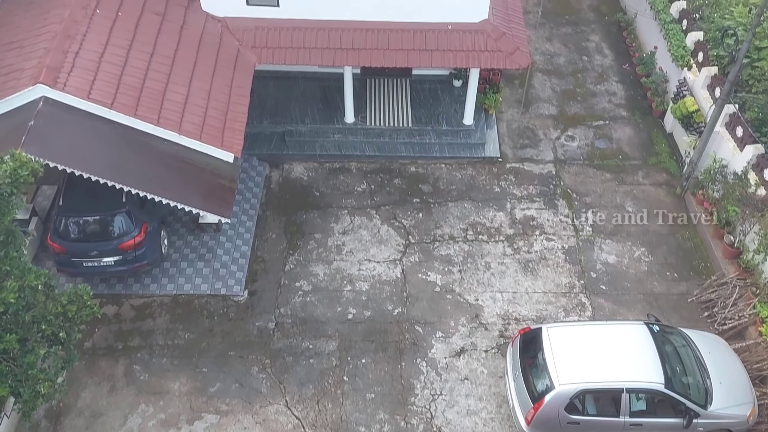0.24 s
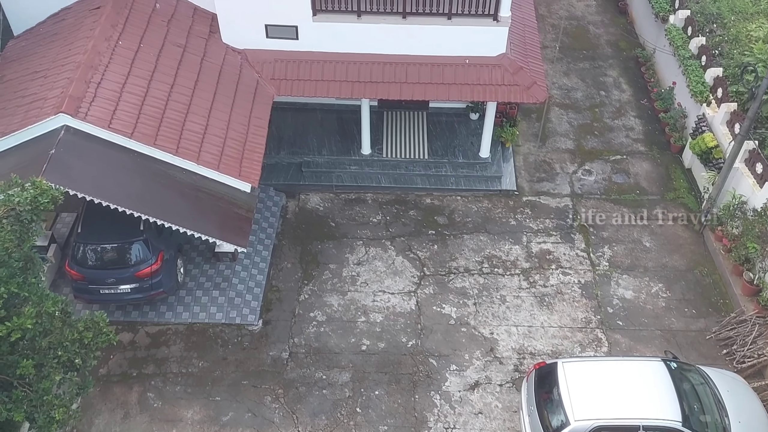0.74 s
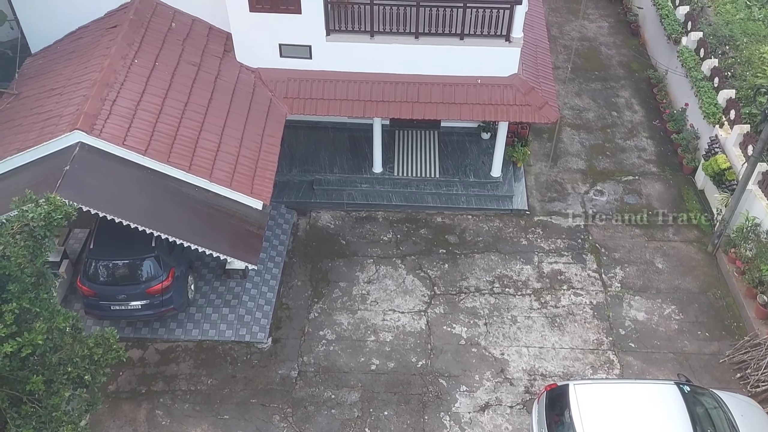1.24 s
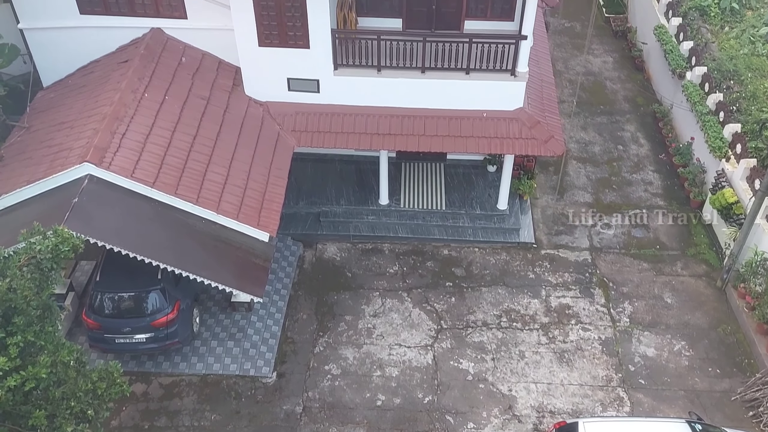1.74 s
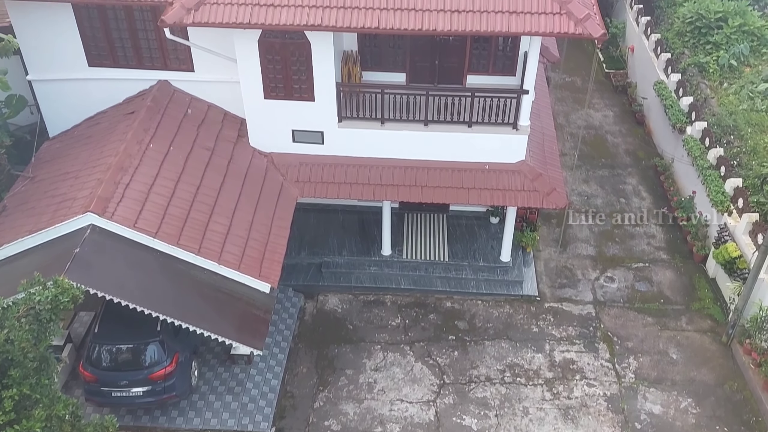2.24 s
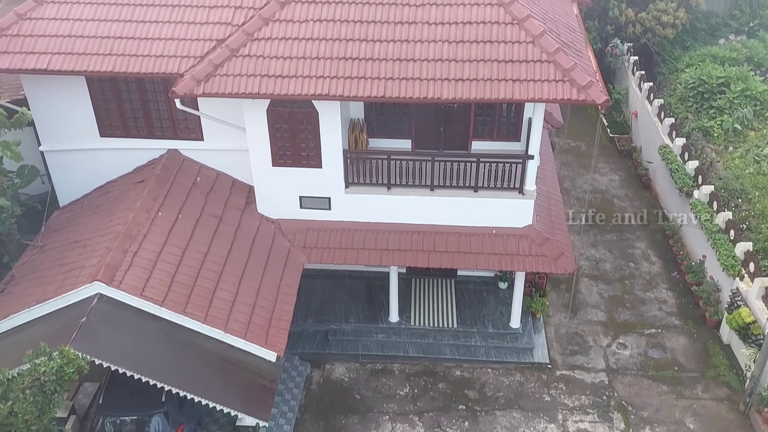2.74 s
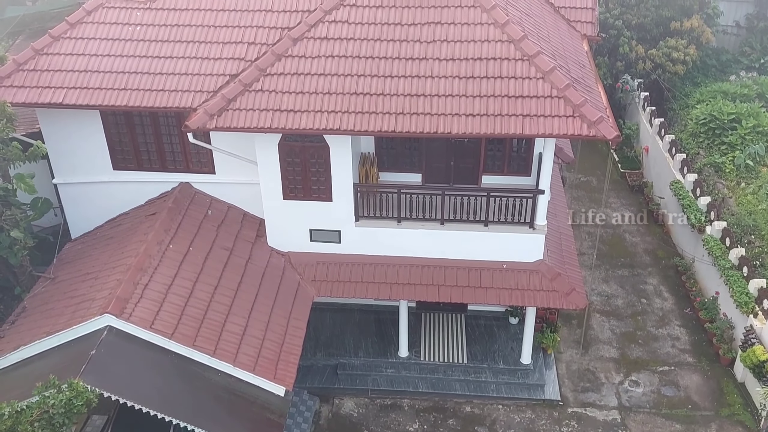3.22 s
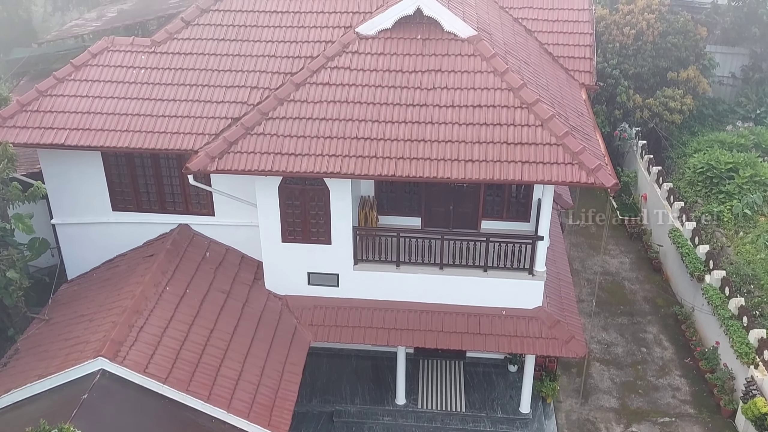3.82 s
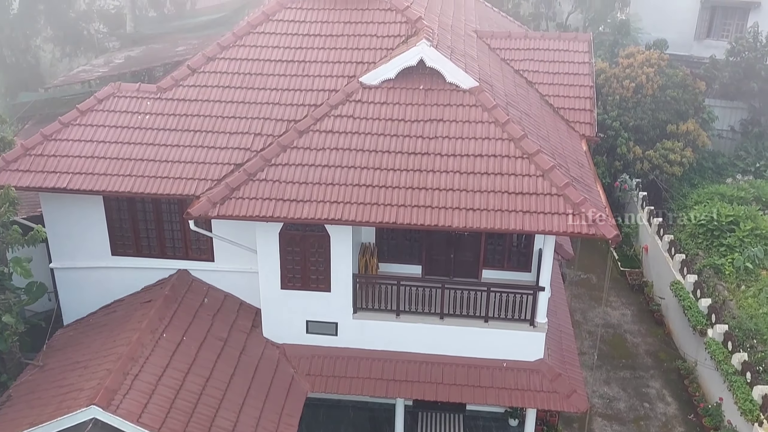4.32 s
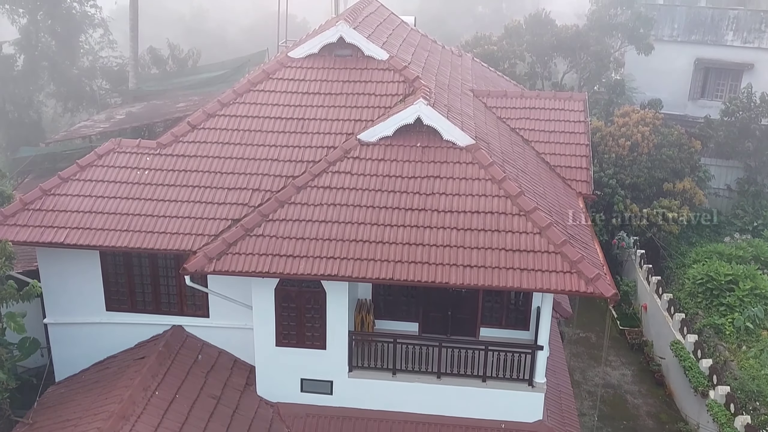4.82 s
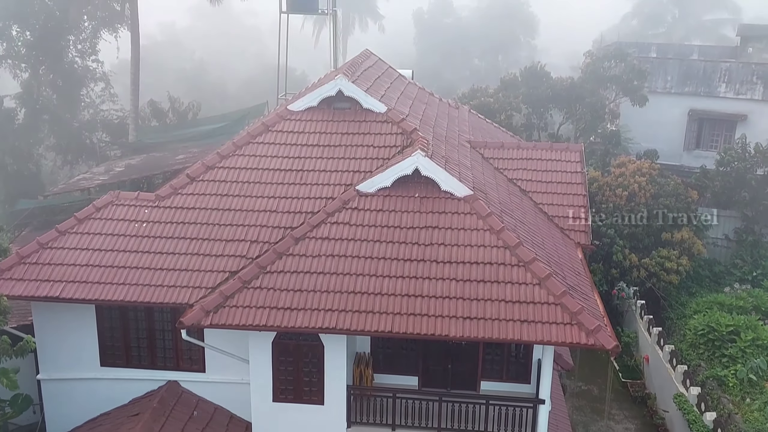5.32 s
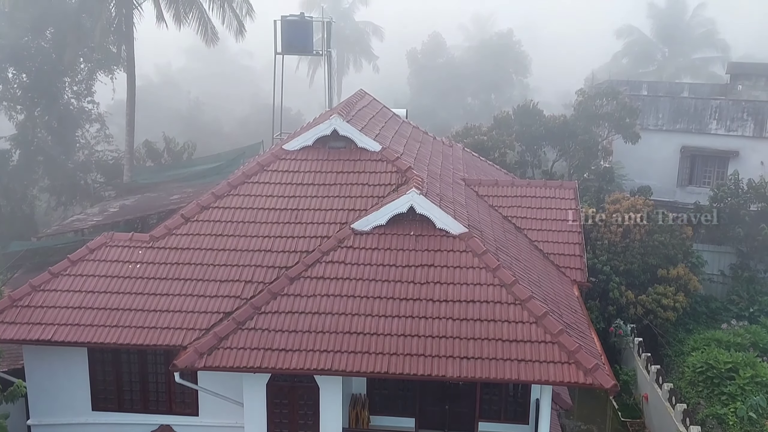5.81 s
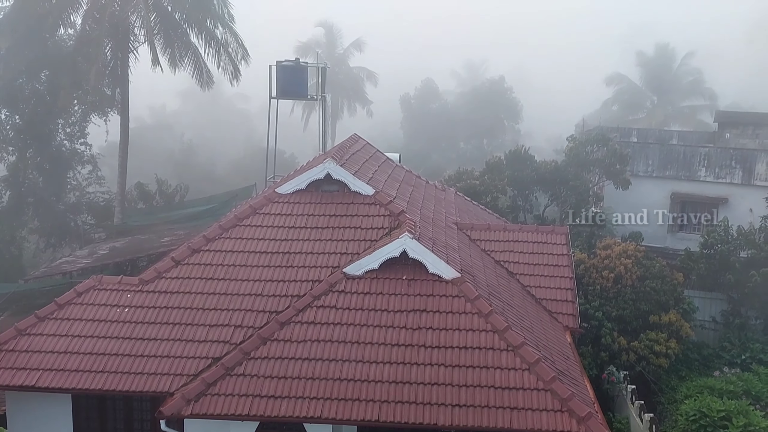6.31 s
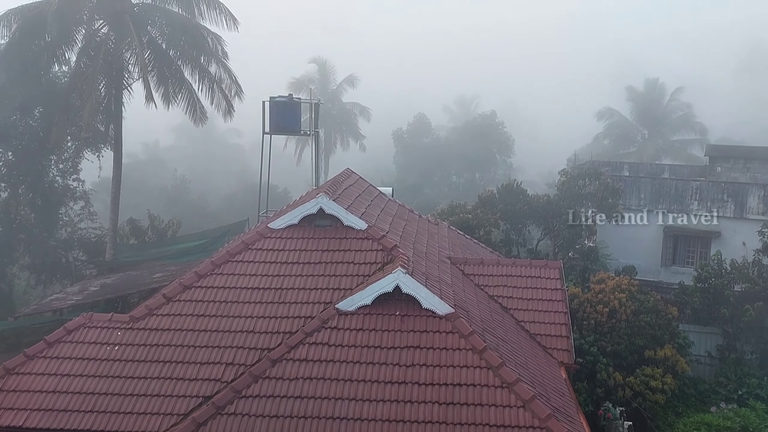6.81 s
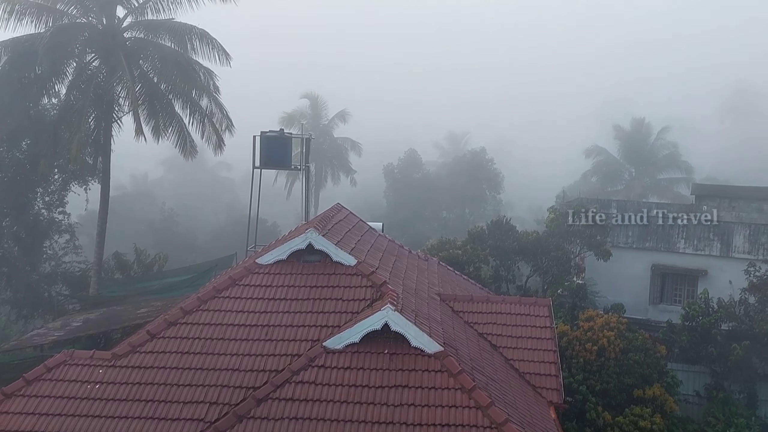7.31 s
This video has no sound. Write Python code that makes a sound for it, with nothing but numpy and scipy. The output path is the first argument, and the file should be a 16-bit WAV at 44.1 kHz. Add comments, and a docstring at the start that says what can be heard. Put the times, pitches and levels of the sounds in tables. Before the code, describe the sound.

Many small birds chirp from the first moment, thin whistles and quick twitters leaning right, with fainter birds deep in the trees. Beneath them lie low road rumble, faint hum and flickering hiss. Grit crunches and stones snap near the stereo microphone. Halfway, three falling hoarse calls sound beside a lower husky bird; two dull knocks and a tiny cluster of wet drips come next, and birdsong continues to the end.

```python
"""Early morning in a garden: traffic rumble, engine drone and hiss run throughout, as filtered noise and sines.
Gritty scuffs (noise grains under a push) and dry rustling start at once, then small birds, gliding sines
mostly to the right, whistle, slur and twitter to the end. Insects rasp most from 1.2 to 3.8 s. A larger bird
calls three times from 3.1 to 4.3 s, a lower, huskier one beside it; two thuds (damped modes) land near 5.05 s.
Wet plips, sines that ring for a few cycles, come at 2.96 s and in a cluster near 5.39 s."""
import sys
import numpy as np
from scipy import signal
from scipy.fft import rfft, irfft
from scipy.io import wavfile

SR = 44100
rng = np.random.default_rng(int(sys.argv[2]) if len(sys.argv) > 2 else 0)


def generate_wav(sig):
    """Save sig (samples, or channels by samples) to the path in sys.argv[1] as 16-bit PCM at SR."""
    pcm = np.round(np.clip(np.atleast_2d(sig).T, -1, 1) * 32767).astype(np.int16)
    wavfile.write(sys.argv[1], SR, pcm)


N = 333175
T = np.arange(N) / SR
PORT_LAG_S = .00047  # travel time between the two microphone ports
SWELL_POWER, HELD_POWER = .4, .18  # note envelope exponents: swelling, firmly held


def undb(db):
    """Decibels to gain."""
    return 10 ** (np.asarray(db) / 20)


def unit(x):
    """Scale to rms 1."""
    return x / np.sqrt(np.mean(x ** 2))


def curves(table):
    """Columns of a table against its first (s), joined by straight lines."""
    s, *columns = np.transpose(table)
    return [np.interp(T, s, c) for c in columns]


def walk(rate_hz, size=N):
    """Random curve with rate_hz knots per second and a spread near 1."""
    at = np.arange(size) * rate_hz / SR
    return 1.275 * np.interp(at, np.arange(8192), rng.standard_normal(8192))


def surges(table):
    """Gain of sounds that swell and fade in a bell shape, summed in power."""
    power = 0
    for s, width_s, db in table:
        power = power + undb(2 * db) * np.exp(-np.minimum(((T - s) / width_s) ** 2, 60))
    return np.sqrt(power)


def colour(x, points):
    """Filter by a (Hz, dB) outline that falls 24 dB per octave more beyond its ends; rms 1."""
    size = 2 ** 19
    hz, db = np.transpose(points)
    octave, knots = np.log2(np.fft.rfftfreq(size, 1 / SR) + 1), np.log2(hz)
    outside = np.abs(octave - np.clip(octave, knots[0], knots[-1]))
    gain = undb(np.interp(octave, knots, db) - 24 * outside)
    return unit(irfft(rfft(x, size) * gain)[..., :N])


def stereo_noise(likeness):
    """Two white noises with a given correlation."""
    mid, side = rng.standard_normal((2, N))
    c = np.clip(likeness, -1, 1)
    return np.sqrt(1 + c) * mid + np.sqrt(1 - c) * side * np.array([[1], [-1]])


def grains(spread_db):
    """Noise broken into millisecond grains of unequal size."""
    return rng.standard_normal(N) * undb(spread_db * walk(900))


def pan(right_db):
    """Left and right gains, right_db apart, whose mean is 1."""
    gains = undb(np.array([[-right_db], [right_db]]) / 2)
    return gains / gains.mean()


def from_the_side(pair):
    """The right channel arrives one port spacing late."""
    return np.array([pair[0], np.interp(T - PORT_LAG_S, T, pair[1])])


def add(track, s, sound):
    """Mix a sound in at a time."""
    i = int(np.clip(s * SR, 0, N - 1))
    track[i:i + len(sound)] += sound[:N - i]


def garden(x, right_db, lag_s, wet_db, t60_s):
    """Direct sound reaches the right port lag_s late; walls and foliage scatter a short noise tail."""
    t = T[:SR // 2]
    tail = rng.standard_normal((2, len(t))) * undb(-60 * t / t60_s) * (1 - np.exp(-t / 0.0013))
    tail /= np.sqrt(np.sum(tail ** 2, axis=1, keepdims=True))
    direct = np.array([x, np.interp(T - lag_s, T, x)])
    scattered = signal.fftconvolve(x[None], tail, axes=1)[:, :N]
    return pan(right_db) * (direct + undb(wet_db) * scattered)


def traffic():
    """Far traffic: rumble nearly common to both sides and a wider road noise."""
    # Each row: time in s, rumble in dB, road noise in dB.
    level_rows = [(0, -41, -39.5), (.3, -39, -44), (.7, -44.5, -44.5), (1.4, -39, -43), (3.3, -40.5, -42),
                  (5.6, -39.5, -43.5), (6.15, -44, -48), (6.6, -40, -46.5), (7.55, -44, -47.5)]
    # Spectra. Each row: frequency in Hz, relative level in dB.
    rumble_outline = [(20, -36), (35, -13), (50, -15.5), (75, 1), (125, -1.5), (160, -10.5), (230, -27.5)]
    road_outline = [(100, -8), (180, -0.5), (280, -0.5), (350, -7), (410, -7.5), (550, -15.5), (850, -21.5),
                    (1400, -32), (2500, -55)]
    rumble_db, road_db = curves(level_rows)
    rumble = pan(3.1) * undb(rumble_db) * colour(stereo_noise(0.99), rumble_outline)
    road = pan(0.23) * undb(road_db) * colour(stereo_noise(0.83), road_outline)
    return rumble + road


def traffic_swells():
    """Hollow swells of traffic near 200 Hz: band noise under bell curves."""
    # Each row: peak in s, half width in s, level in dB.
    swell_rows = [(.02, 0.2, -40), (2.12, 0.14, -41), (3.4, 0.81, -52)]
    # Spectrum. Each row: frequency in Hz, relative level in dB.
    outline = [(140, 8), (170, 7), (230, 3.5), (280, -21)]
    return pan(0.92) * surges(swell_rows) * colour(stereo_noise(0.93), outline)


def engine(table, orders, waver):
    """Only some orders of a far engine's cycle rate carry; the air makes each one waver."""
    hz, db = curves(table)
    phase = 2 * np.pi * np.cumsum(hz) / SR
    drone = np.zeros(N)
    for multiple, order_db in orders:
        strength = undb(order_db) * (1 + waver * walk(4.3))
        shift = 2 * np.pi * rng.random() + waver * walk(6.5)
        drone += strength * np.sin(round(multiple) * phase + shift)
    return pan(0.31) * undb(db) * unit(drone)


def engines():
    """Two far engines drone, each with its own rate and orders."""
    # Each row: time in s, cycle rate in Hz, level in dB.
    course_a = [(0, 18.4, -62), (1.3, 21, -44), (2.2, 19.5, -42), (2.6, 18.6, -35), (3.6, 21, -36.5),
                (4.3, 18, -42.5), (5.2, 17, -41.5), (6.1, 14.7, -53.5), (6.5, 19.9, -46),
                (7.55, 16.2, -53.5)]
    course_b = [(0, 16.8, -50.5), (2.3, 26.2, -46.5), (3.6, 21.2, -40.5), (4.3, 22, -39.5), (4.7, 23, -37),
                (5.1, 21.5, -41), (6, 17.7, -57), (7.55, 11.4, -83)]
    # Each row: multiple of the cycle rate, relative level in dB.
    orders_a = [(3, -2.5), (5, -12), (6, 4), (7, 3.5), (13, -10.5), (14, -17)]
    orders_b = [(2, -7.5), (3, -2.5), (8, -14.5)]
    return engine(course_a, orders_a, waver=0.1) + engine(course_b, orders_b, waver=0.04)


def hum():
    """A faint sine near 398 Hz wavers in pitch and level."""
    hz = 398 + 4 * walk(9)
    level_db = -56.0 + 2.5 * walk(5.5)
    return pan(1.6) * undb(level_db) * np.sin(2 * np.pi * np.cumsum(hz) / SR)


def hisses():
    """Flickering mid and high hisses lean right over a steady one: coloured noises."""
    # Each row: time in s, level in dB before the gain below.
    mid_rows = [(0.0, -55), (0.53, -55), (0.9, -54.5), (1.24, -51.5), (1.64, -53.5), (1.87, -52),
                (3.22, -50), (4.81, -52), (5.0, -52), (5.55, -53.5), (6.64, -55), (7.55, -55)]
    high_rows = [(0.0, -58), (0.38, -56.5), (0.73, -56), (2.19, -59.5), (2.94, -56), (5.61, -59),
                 (5.72, -54), (5.9, -58), (6.27, -63.5), (6.6, -54), (7.55, -61)]
    # Spectra. Each row: frequency in Hz, relative level in dB.
    mid_outline = [(400, 10), (800, -10.5), (1300, 3.5), (1550, -0.5), (1800, 1), (2200, 2.5), (2700, 0.5),
                   (2950, 1), (3400, -6), (5000, -59), (7000, -52)]
    steady_outline = [(500, -11), (680, 2), (900, -3), (1350, 0), (1800, -8), (2600, -27)]
    high_outline = [(1000, 4.5), (2800, 3), (4000, 5.5), (5000, 4.5), (5500, -4.5), (6600, -5.5),
                    (7600, -8), (8300, -31.5), (11000, -19.5), (15000, -20.5)]
    mid_gain_db, high_gain_db = 3, 4
    mid_db = curves(mid_rows)[0] + mid_gain_db + 0.87 * walk(15)
    high_db = curves(high_rows)[0] + high_gain_db + 1.3 * walk(12)
    mid = pan(11.6) * undb(mid_db) * colour(stereo_noise(0.38), mid_outline)
    steady = pan(1.4) * undb(-53.5) * colour(stereo_noise(0.81), steady_outline)
    high = pan(5.0) * undb(high_db) * colour(stereo_noise(0.23), high_outline)
    return from_the_side(mid + steady + high)


def insects():
    """Far insects rasp near one pitch: a narrow noise band in short random bursts."""
    # Each row: time in s, level in dB.
    level_rows = [(0, -62), (.85, -67), (1.2, -52.5), (1.7, -48.5), (2, -52.5), (2.45, -51), (3.1, -51),
                  (3.8, -55.5), (4.8, -63), (5.6, -68), (7.55, -59.5)]
    # Spectrum. Each row: frequency in Hz, relative level in dB.
    outline = [(1700, -12.5), (2000, -3), (2170, -1), (2300, -3.5), (2480, -2), (2650, -8.5)]
    level_db = curves(level_rows)[0]
    bursts = undb(2.2 * walk(60))
    band = colour(stereo_noise(0.59) * bursts, outline)
    return pan(8.4) * undb(level_db) * from_the_side(band)


def rustling():
    """Spells of dry rustling on the right: bright noise grains over a faint constant bed."""
    # Each row: peak in s, half width in s, level in dB.
    spells = [(1.98, 0.12, -63), (3.2, 0.15, -67), (4.26, 0.078, -58), (5.15, 0.22, -65), (5.72, 0.22, -70),
              (6.7, 0.05, -58), (7, 0.4, -57.5)]
    # Spectrum. Each row: frequency in Hz, relative level in dB.
    outline = [(5000, 10), (8200, -9), (9500, -1), (12500, -4.5), (15500, -7.5)]
    rest_db = -71
    strength = np.hypot(surges(spells), undb(rest_db))
    return pan(14.4) * strength * colour(np.array([grains(3.6), grains(1.1)]), outline)


def thuds():
    """Dull knocks as the weight lands: a soft blow rings a few low, heavily damped modes."""
    # Each row: time in s, level in dB before the scatter.
    blows = [(5.026, -31.5), (5.079, -28)]
    # Each row: mode frequency in Hz, relative level in dB.
    modes = [(310, -0.5), (395, 0), (520, -5.5), (690, -22)]
    rise_s, decay_s = .001, 0.006
    t, track = T[:SR // 10], np.zeros(N)
    envelope = (1 - np.exp(-t / rise_s)) * np.exp(-t / decay_s)
    for s, db in blows:
        ring = sum(undb(mode_db) * np.sin(2 * np.pi * (hz * t + rng.random())) for hz, mode_db in modes)
        add(track, s, undb(db) * envelope * ring)
    return garden(track, right_db=-2, lag_s=0, wet_db=-9, t60_s=0.31)


def scuffs():
    """Grit grinds under a push: a dull crunch, a bright spray and stones snapping, with a glassy edge."""
    # Each row: peak in s, rise in s, body and grit in relative dB.
    pushes = [(.03, 0.042, -52.5, -63.5), (.345, 0.039, -49, -66), (1.03, 0.057, -50.5, -61),
              (1.723, 0.041, -48, -65.5), (1.857, 0.024, -54, -64), (2.48, 0.076, -53, -62.5),
              (3.772, 0.037, -42.5, -53.5), (4.46, 0.056, -51, -62.5), (5.034, 0.0059, -37.5, -58),
              (5.059, 0.0068, -35, -54), (5.074, 0.0089, -37.5, -52), (5.095, 0.01, -52, -59),
              (5.16, 0.039, -53, -63), (5.735, 0.058, -68, -61.5), (6.357, 0.009, -41, -62),
              (6.412, 0.025, -40, -50.5), (7.034, 0.038, -45, -51.5)]
    # Each row: time in s, snap level in dB, glassy edge level in dB.
    tick_rows = [(1.029, -40, -56), (1.041, -40, -54), (1.855, -40, -56), (2.432, -45, -56),
                 (2.452, -39, -50), (2.492, -41, -55), (2.521, -42.5, -55), (2.561, -46, -56),
                 (3.764, -34, -42), (3.798, -38, -49), (5.037, -41, -54), (5.063, -39, -44),
                 (5.073, -38, -41), (5.736, -35, -53), (5.778, -46, -48), (6.351, -41, -56),
                 (6.389, -34, -53), (6.395, -38, -56), (6.407, -39, -37), (6.414, -40, -40),
                 (6.442, -38, -54), (7.04, -33, -37)]
    # Spectra. Each row: frequency in Hz, relative level in dB.
    body_outline = [(100, 9.5), (350, 2), (700, -1), (1600, -7), (2300, 1.5), (4200, -4.5), (5500, -7.5),
                    (7500, -43), (9000, -46)]
    grit_outline = [(2000, -20), (4500, -6), (7000, 12), (8500, -2), (11000, 4.5), (13500, 2), (15500, -12)]
    snap_outline = [(500, 9), (2500, 5.5), (6000, 9), (7400, -5), (8500, -14), (11000, -11), (14000, -16)]
    edge_outline = [(7000, -5), (9000, -4), (11000, -1), (13500, -1), (15500, -5)]
    fall_ratio = 0.82  # fall time over rise time
    snap_decay_s, edge_decay_s = 0.0023, .0011
    body, grit, snap, edge = np.zeros((4, N))
    for s, rise_s, body_db, grit_db in pushes:
        distance = np.maximum((s - T) / rise_s, (T - s) / (fall_ratio * rise_s))
        push = np.exp(-np.minimum(distance, 20))
        body += undb(body_db) * push
        grit += undb(grit_db) * push
    t = T[:SR // 50]
    for s, db, edge_db in tick_rows:
        add(snap, s, undb(db) * np.exp(-t / snap_decay_s))
        add(edge, s, undb(edge_db) * np.exp(-t / edge_decay_s))
    crunch = body * colour(grains(3.5), body_outline) + grit * colour(grains(5), grit_outline)
    ticks = snap * colour(rng.standard_normal(N), snap_outline)
    ticks += edge * colour(rng.standard_normal(N), edge_outline)
    ground = undb(-0.5) * garden(crunch, right_db=12.5, lag_s=PORT_LAG_S, wet_db=-0.5, t60_s=0.18)
    return ground + garden(ticks, right_db=13, lag_s=PORT_LAG_S, wet_db=-6.5, t60_s=0.16)


def plips():
    """Sharp wet plips, perhaps dew dripping, close and dry: sines that ring for a few cycles."""
    # Each row: start in s, pitch in Hz, ring in s (start to peak), level in dB.
    drops = [(2.9605, 3100, .0012, -34), (5.3865, 1550, .0009, -37), (5.3888, 2650, .0008, -29),
             (5.3907, 2300, .0005, -30), (5.3948, 6600, .0016, -48)]
    t, track = T[:SR // 50], np.zeros(N)
    for s, hz, ring_s, db in drops:
        envelope = (t / ring_s) ** 2 * np.exp(2 * (1 - t / ring_s))
        add(track, s, undb(db) * envelope * np.sin(2 * np.pi * hz * t))
    return garden(track, right_db=17, lag_s=PORT_LAG_S, wet_db=-16, t60_s=.3)


def note(length_s, start_hz, middle_hz, end_hz, waver, flutter, flutter_hz, overtone_db, power=SWELL_POWER):
    """One whistle of the syrinx: pitch bends along an arc while the air pressure swells and fades."""
    size = int(max(length_s, .008) * SR)  # at least 8 ms
    u = np.linspace(0, 1, size)
    hz = np.polyval(np.polyfit([0, .5, 1], [start_hz, middle_hz, end_hz], 2), u)
    phase = 2 * np.pi * np.cumsum(hz * (1 + waver * walk(flutter_hz, size))) / SR
    edges = np.minimum(1, length_s * np.minimum(u, 1 - u) / .002)
    swell = edges * np.abs(np.sin(np.pi * u)) ** power * (1 + flutter * walk(flutter_hz, size))
    return swell * (np.sin(phase) + undb(overtone_db) * np.sin(2 * phase))


def phrase(points, waver, flutter):
    """One unbroken whistle that follows (s, Hz, dB) points and trembles."""
    s, hz, db = np.transpose(points)
    t = np.arange(s[0], max(s[-1], s[0] + .01), 1 / SR)
    bend = np.interp(t, s, hz) * (1 + waver * walk(600, len(t)))
    pressure = undb(np.interp(t, s, db)) * (1 + flutter * walk(600, len(t)))
    return pressure * np.sin(2 * np.pi * np.cumsum(bend) / SR)


def sing(table, waver, flutter, flutter_hz, overtone_db, power):
    """All notes of one bird."""
    song = np.zeros(N)
    for s, *shape, db in table:
        add(song, s, undb(db) * note(*shape, waver, flutter, flutter_hz, overtone_db, power))
    return song


def glides(table, arch):
    """Notes from one pitch to another, bowed upward in the middle by the share arch."""
    return [(s, length_s, start, (start + end) / 2 * (1 + arch), end, db)
            for s, length_s, start, end, db in table]


def arches(table):
    """Notes that rise to a top and come down again."""
    return [(s, length_s, foot, top, foot, db) for s, length_s, foot, top, db in table]


def doubled(song, echo_db):
    """A song with quick echoes off stems and eaves, at about the same strength."""
    # Each row: delay in s, level in dB before echo_db.
    near_echoes = [(.0035, -14.5), (.009, -24), (.017, -20)]
    echoes, power = np.zeros(N), 1
    for s, db in near_echoes:
        echoes += undb(db + echo_db) * np.interp(T - s, T, song)
        power += undb(db + echo_db) ** 2
    return (song + echoes) / np.sqrt(power)


def off_the_house(song):
    """A song with quick echoes and one later return from the house front."""
    wall_s, wall_db = 0.051, -21
    song = doubled(song, echo_db=-1)
    return song + undb(wall_db) * np.interp(T - wall_s, T, song)


def far_chorus(count=170):
    """Many faint birds deep in the trees: short chirps at random times and pitches."""
    song = np.zeros(N)
    for when, span, pitch, bend, slope, softness in rng.random((count, 6)):
        hz = 2700 + 2400 * pitch
        start_hz, middle_hz, end_hz = hz * (.85 + .35 * slope), hz * (.9 + .2 * bend), hz * (1.05 - .35 * slope)
        chirp = note(.01 + .03 * span, start_hz, middle_hz, end_hz,
                     waver=.02, flutter=.4, flutter_hz=400, overtone_db=-35)
        add(song, when * T[-1], undb(-58.5 - 7 * softness) * chirp)
    return garden(song, right_db=8, lag_s=0, wet_db=0, t60_s=.4)


def hoarse(table):
    """Rough notes: pitch and strength shake quickly."""
    song = np.zeros(N)
    for s, *shape, db, rough in table:
        sound = note(*shape, waver=.055 * rough, flutter=.6 * rough, flutter_hz=420,
                     overtone_db=-30, power=HELD_POWER)
        add(song, s, undb(db) * sound)
    return song


def husky_bird():
    """A lower, huskier bird almost straight ahead: rough notes in two overlapping pairs, then a short faint one."""
    # Each row: start in s, length in s, start, middle and end in Hz, level in dB before gain, roughness 0-1.
    husky_rows = [(3.02, .28, 850, 850, 820, -47.5, 1), (3.05, .24, 1120, 1100, 1050, -46, 1),
                  (3.305, .075, 1020, 1010, 980, -42.5, .5), (3.32, .085, 920, 895, 890, -42.5, .4),
                  (3.505, .04, 900, 900, 890, -48, .2)]
    return undb(-3) * garden(hoarse(husky_rows), right_db=2, lag_s=0, wet_db=-5, t60_s=.7)


def calls():
    """Each call starts on an upper pitch; a lower one joins and sinks under a rasp; a flick closes it."""
    # Each row: start in s, length in s, start in Hz, end in Hz, level in dB before gain, roughness 0-1,
    # rasp in dB relative to the call, pause before the flick in s.
    call_rows = [(3.078, 0.18, 1460, 1306, -31.5, 0.31, -21, 0.01),
                 (3.579, 0.16, 1437, 1301, -31, 0.2, -26, .033),
                 (4.123, .19, 1351, 1287, -36, 0.33, -10, 0.022)]
    arch = 0.016  # upward bow in the middle
    upper_ratio, upper_share, upper_db = 1.05, .66, -2.5  # pitch ratio, share of length, relative dB
    lower_delay = 0.14  # share of the call before the lower pitch joins
    rasp_ratio = 1.33  # pitch of the husky overtone over the call
    flick_s, flick_hz, flick_db = .042, (1723, 1540, 1270), -7  # length, start-middle-end, relative dB

    def sinking(start, end, first, last):
        """Start, middle and end pitch over part of a call."""
        return (start + (end - start) * np.linspace(first, last, 3)) * np.array([1, 1 + arch, 1])

    notes = []
    for s, length, start, end, db, rough, rasp_db, pause in call_rows:
        upper = upper_ratio * sinking(start, end, 0, upper_share)
        lower = sinking(start, end, lower_delay, 1)
        rasp = rasp_ratio * sinking(start, end, 0, 0.96)
        notes += [(s, length * upper_share, *upper, db + upper_db, rough),
                  (s + length * lower_delay, length * (1 - lower_delay), *lower, db, rough),
                  (s, length, *rasp, db + rasp_db, 1),
                  (s + length + pause, flick_s, *flick_hz, db + flick_db, rough)]
    return notes


def large_caller():
    """A larger bird further off gives three falling, rough calls, each on two pitches."""
    return undb(-2) * garden(hoarse(calls()), right_db=5.5, lag_s=PORT_LAG_S, wet_db=-8, t60_s=.7)


def slurrer():
    """Straight downward slurs through the leaves, echoed off the house."""
    # Each row: start in s, length in s, start in Hz, end in Hz, level in dB before gain.
    slur_rows = [(.44, 0.078, 6920, 4360, -43.5), (.672, .06, 5500, 3070, -44),
                 (.836, 0.037, 6600, 5830, -47), (.865, 0.053, 5530, 3760, -46),
                 (1.1, 0.035, 6600, 5380, -45), (1.153, 0.037, 5200, 3520, -37),
                 (3.387, 0.043, 4100, 3070, -46), (3.825, .048, 5640, 4600, -44),
                 (3.872, 0.045, 4330, 3010, -41), (6.735, .04, 5200, 4400, -44),
                 (6.753, 0.027, 6200, 5400, -51)]
    slurs = sing(glides(slur_rows, 0), waver=.011, flutter=.35, flutter_hz=350,
                 overtone_db=-42, power=SWELL_POWER)
    return undb(-7.5) * garden(off_the_house(slurs), right_db=10.5, lag_s=PORT_LAG_S, wet_db=-1, t60_s=0.7)


def long_whistles():
    """Drawn-out notes that swell and bend up or sweep down in one breath."""
    # One list per whistle. Each row: time in s, pitch in Hz, level in dB before gain.
    breaths = [
        [(2.715, 4960, -52), (2.78, 5000, -46), (2.83, 4940, -38), (2.868, 5000, -40), (2.895, 5180, -48),
         (2.93, 5650, -49), (2.95, 5900, -56)],
        [(3.025, 6440, -58), (3.095, 6000, -51), (3.12, 5240, -43), (3.148, 4680, -38), (3.172, 3930, -37.5),
         (3.192, 3300, -43), (3.202, 3000, -54)],
        [(4.68, 4720, -52), (4.7, 4990, -45), (4.74, 5100, -41), (4.79, 5460, -46), (4.84, 5700, -43),
         (4.885, 5750, -50)],
        [(6.32, 4750, -52), (6.37, 4860, -41), (6.42, 4900, -35.5), (6.47, 5080, -36), (6.5, 5600, -41),
         (6.53, 6400, -49), (6.55, 6500, -61)],
        [(6.575, 6690, -52), (6.64, 6930, -47), (6.655, 6720, -34.5), (6.676, 5840, -37.5), (6.69, 5400, -44),
         (6.712, 5000, -34), (6.74, 4300, -40), (6.765, 3500, -37), (6.775, 3200, -55)],
        [(7.068, 6700, -47), (7.09, 5950, -37), (7.12, 5330, -41), (7.148, 4850, -30.5), (7.168, 4510, -38.5),
         (7.185, 3850, -49)],
    ]
    song = np.zeros(N)
    for points in breaths:
        add(song, points[0][0], phrase(points, waver=.009, flutter=.22))
    return song


def whistler():
    """Thin short and long whistles through the leaves, echoed off the house, and lingering twitter tails."""
    # Each row: start in s, length in s, start in Hz, end in Hz, level in dB before gain.
    # The rows near 3.2 kHz are lingering reverberation of twitters.
    whistle_rows = [(.148, 0.08, 4670, 5090, -39.5), (.215, 0.11, 5040, 5680, -40),
                    (.215, .145, 4900, 5080, -38), (1.47, 0.16, 5180, 5220, -54),
                    (2.463, 0.031, 5030, 4880, -36), (2.96, .048, 5230, 5260, -46),
                    (4.268, 0.035, 5040, 5140, -41), (4.325, .028, 5900, 5600, -50),
                    (4.51, 0.095, 3220, 3260, -40.5), (5.675, 0.071, 5200, 5080, -45),
                    (5.835, 0.074, 5080, 5060, -48), (5.875, 0.05, 3160, 3150, -38),
                    (6.46, 0.097, 4980, 4930, -47)]
    whistles = sing(glides(whistle_rows, arch=0.0155), waver=.009, flutter=.25, flutter_hz=600,
                    overtone_db=-42, power=HELD_POWER)
    song = off_the_house(whistles + long_whistles())
    return undb(-7.5) * garden(song, right_db=9.5, lag_s=PORT_LAG_S, wet_db=-3.0, t60_s=0.79)


def trill(count=4):
    """Evenly spaced pips on one arched pitch."""
    start_s, step_s, length_s, hz, db = .321, 0.018, 0.0076, 5960, -41.5  # dB before gain
    pips = [(start_s + k * step_s, length_s, hz, hz, db) for k in range(count)]
    return glides(pips, arch=0.053)


def warbles():
    """One unbroken, slightly rough whistle swings through three humps into a rising hook."""
    # Shared tune. Each row: time in s from the hook's foot, pitch in Hz, relative level in dB, all before
    # the stretch, ratio and level of each warble.
    tune = [(-.044, 3300, -20), (-.037, 4200, -9), (-.032, 3100, -11), (-.023, 3550, -1), (-.019, 2950, -8),
            (-.014, 3000, -22), (-.009, 3700, -4), (-.004, 4000, -3), (0, 2850, -6), (.011, 3250, 1),
            (.017, 3800, -3), (.021, 4450, -16)]
    # Each row: hook in s, stretch in time, pitch ratio, level in dB before gain.
    warble_rows = [(.313, .7, 1.06, -38.5), (4.488, .9, 1.02, -35), (5.738, 1.05, 1.04, -35.5),
                   (6.974, 1.1, 1.02, -34), (7.392, 1, 1, -35)]
    song = np.zeros(N)
    for s, stretch, ratio, db in warble_rows:
        points = [(stretch * at, ratio * hz, db + shape_db) for at, hz, shape_db in tune]
        add(song, s + points[0][0], phrase(points, waver=.018, flutter=.27))
    return song


def twitterer():
    """A nearer, cleaner, drier bird: arched peeps, dropping chirps, rising hooks, a trill and warbles."""
    # Each row: start in s, length in s, foot in Hz, top in Hz, level in dB before gain.
    peeps = [(.018, 0.037, 3740, 4290, -49), (.336, .01, 3600, 4700, -42), (1.783, 0.016, 3800, 5300, -44),
             (1.817, 0.013, 3700, 5060, -46), (2.086, .024, 3050, 3900, -50), (3.834, .05, 3030, 3940, -43),
             (3.932, 0.0088, 3180, 3950, -38), (4.002, 0.032, 3740, 4500, -41),
             (4.019, 0.014, 4000, 5200, -44), (4.079, 0.021, 3400, 4050, -40),
             (4.089, .011, 3630, 4550, -44), (4.416, .022, 3700, 4050, -49), (4.423, .018, 4970, 5900, -51),
             (4.444, 0.0126, 4800, 5180, -35.5), (5.52, .02, 4600, 5800, -50),
             (5.613, 0.014, 4100, 4900, -45), (5.825, 0.021, 4070, 5250, -40),
             (6.91, .026, 3770, 4450, -52)]
    # Each row: start in s, length in s, start in Hz, end in Hz, level in dB before gain.
    chirps = [(.063, .008, 4700, 3950, -41), (.069, 0.022, 3950, 2930, -39.5),
              (.098, 0.011, 4450, 3100, -49), (.34, 0.015, 3700, 2700, -33.5),
              (.356, 0.013, 3860, 2880, -47), (1.13, 0.045, 2950, 2800, -43),
              (1.175, 0.053, 3060, 3110, -43), (1.46, 0.066, 2870, 2830, -49),
              (1.797, 0.019, 3870, 3510, -44), (1.827, .014, 3650, 2600, -39),
              (2.106, .01, 3900, 2680, -41), (3.9, 0.02, 4110, 3900, -32), (3.928, .008, 4400, 3000, -32),
              (4.163, 0.024, 3940, 3520, -33.5), (4.24, .018, 3250, 2500, -42),
              (4.461, 0.0062, 4040, 2800, -41), (5.551, 0.018, 4480, 3030, -39.5),
              (5.574, 0.015, 4900, 3100, -49), (5.625, 0.01, 4300, 3500, -46),
              (5.799, 0.017, 3100, 2650, -42), (5.842, 0.025, 3860, 3370, -39.5),
              (5.998, 0.027, 3930, 3550, -37), (6.063, 0.013, 2460, 2270, -40),
              (6.778, 0.026, 4360, 2900, -41), (6.809, .01, 3800, 3000, -44),
              (7.204, .017, 4000, 2580, -38.5), (7.48, .011, 5630, 3730, -49),
              (7.5, 0.024, 4260, 3300, -41.5), (7.525, 0.013, 5140, 3500, -49)]
    hooks = [(4.195, 0.013, 2750, 3500, -37), (4.211, .013, 2670, 3060, -39),
             (4.452, .014, 2960, 3300, -37), (5.82, .009, 2734, 3400, -43), (6.033, 0.014, 2930, 3730, -38),
             (6.048, 0.011, 2580, 3150, -38)]
    strokes = arches(peeps) + glides(chirps, arch=0.018) + glides(hooks, arch=-0.044) + trill()
    twitters = sing(strokes, waver=.012, flutter=.25, flutter_hz=550, overtone_db=-32, power=HELD_POWER)
    song = doubled(twitters + warbles(), echo_db=-8)
    return undb(-4.5) * garden(song, right_db=14.5, lag_s=PORT_LAG_S, wet_db=-7, t60_s=0.55)


def scene():
    """Birds and scuffs over the background."""
    background = traffic() + traffic_swells() + engines() + hum() + hisses() + insects()
    ground = rustling() + thuds() + scuffs() + plips()
    large_birds = husky_bird() + large_caller()
    small_birds = slurrer() + whistler() + twitterer()
    return background + ground + far_chorus() + large_birds + small_birds


def record(dry):
    """The recorder cuts the top: a steep elliptic low-pass at 15.6 kHz."""
    return signal.sosfilt(signal.ellip(10, .2, 80, 15600, fs=SR, output="sos"), dry)


dry = scene()
out = record(dry)
generate_wav(out)
```